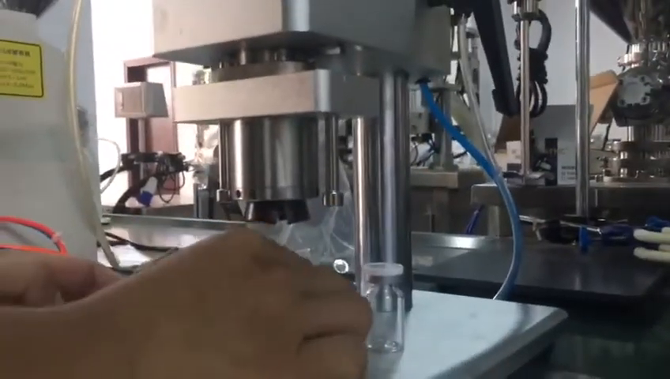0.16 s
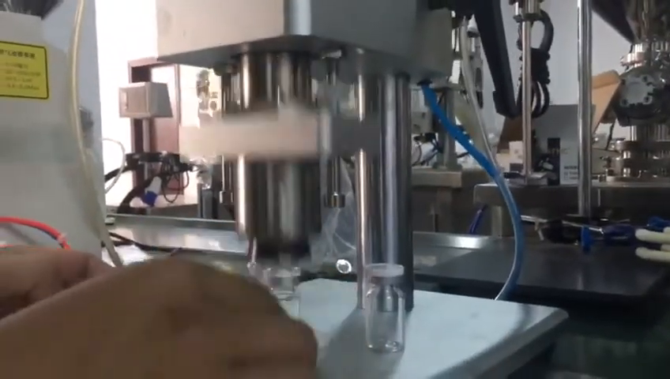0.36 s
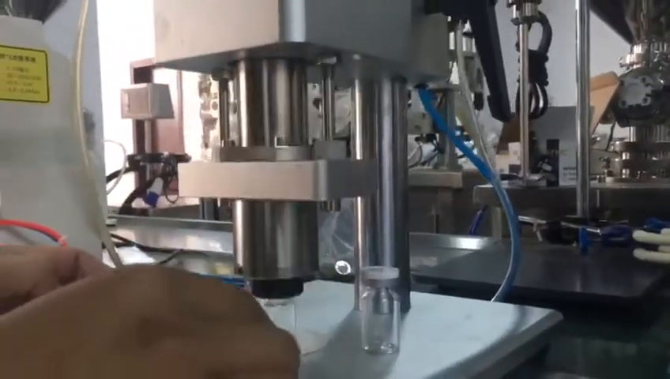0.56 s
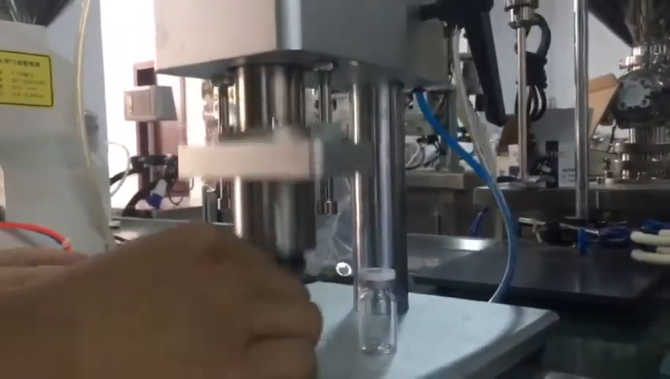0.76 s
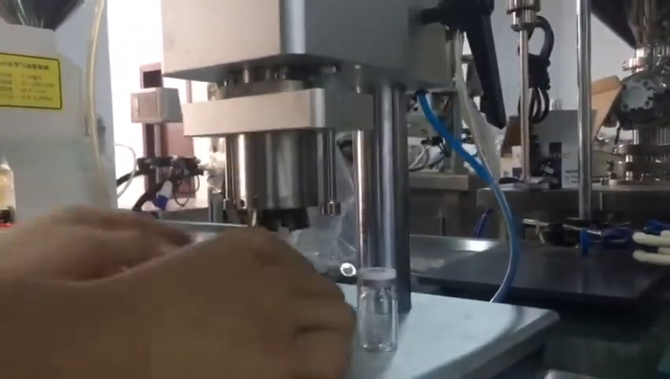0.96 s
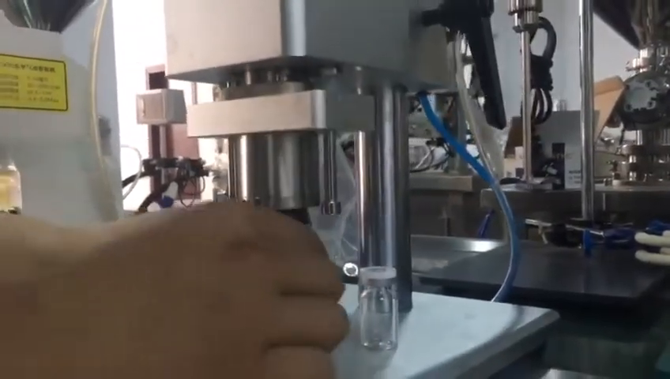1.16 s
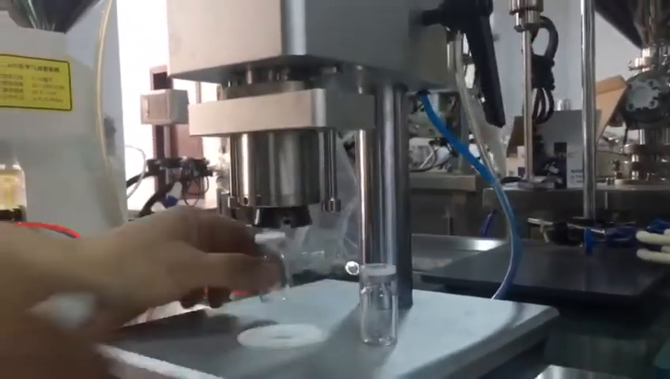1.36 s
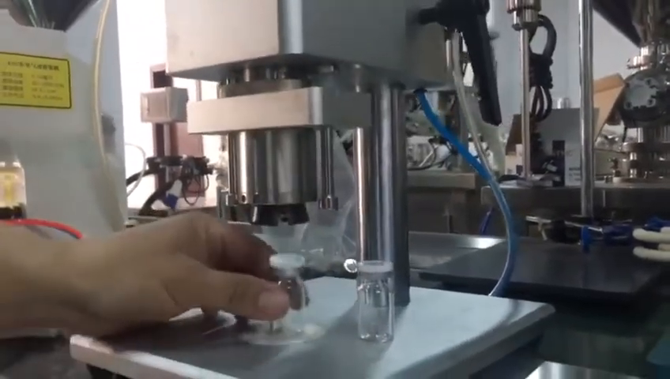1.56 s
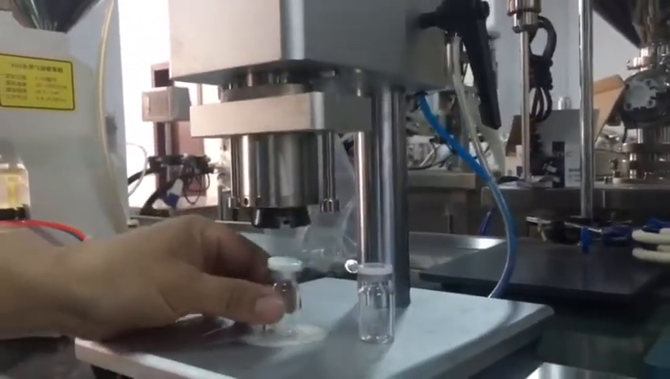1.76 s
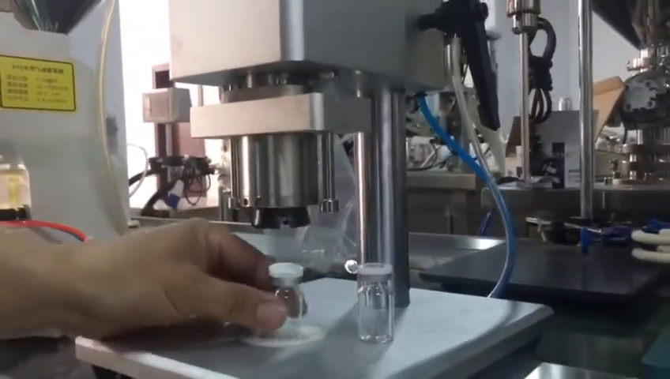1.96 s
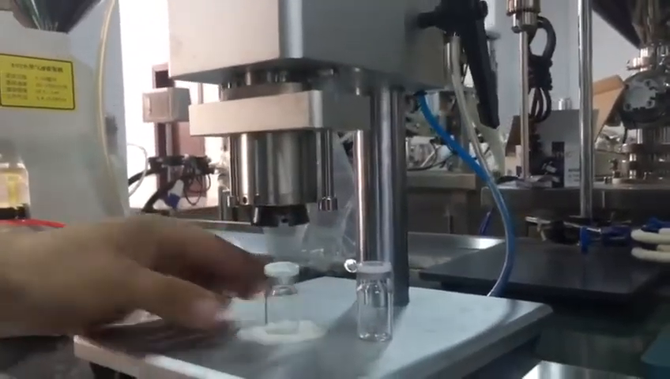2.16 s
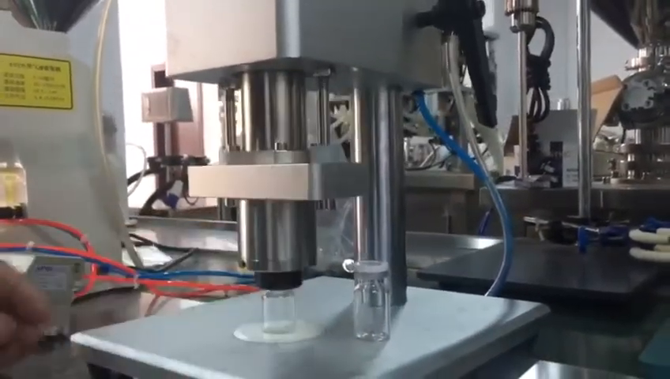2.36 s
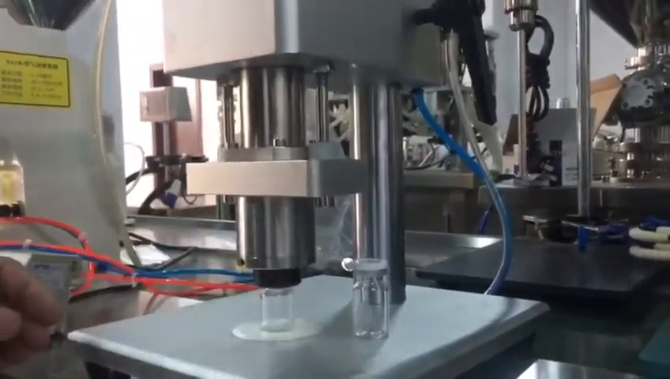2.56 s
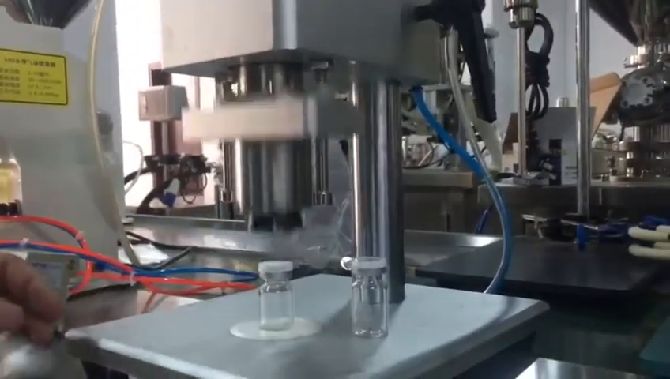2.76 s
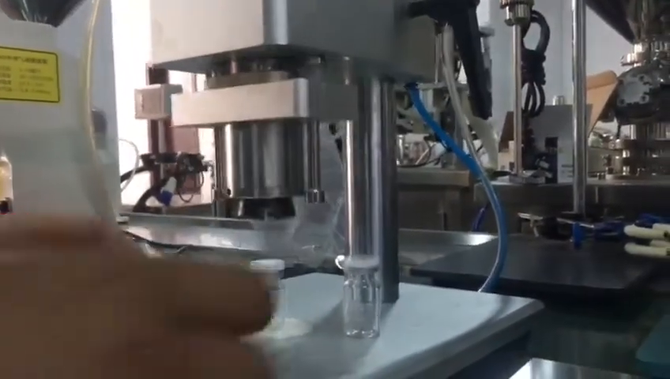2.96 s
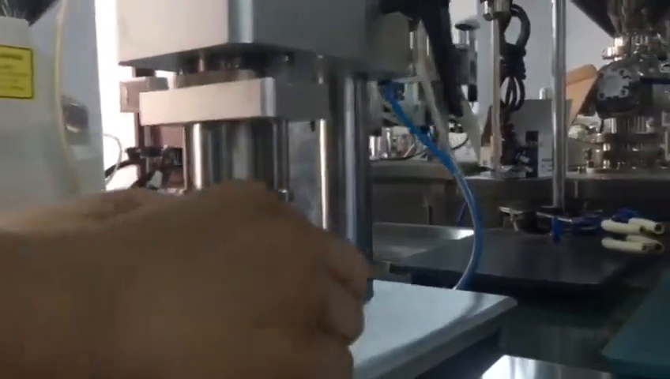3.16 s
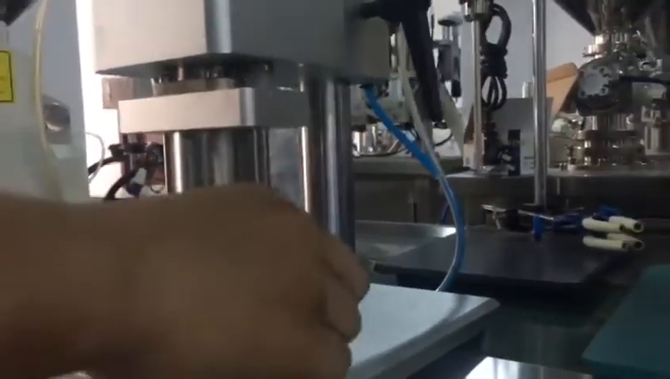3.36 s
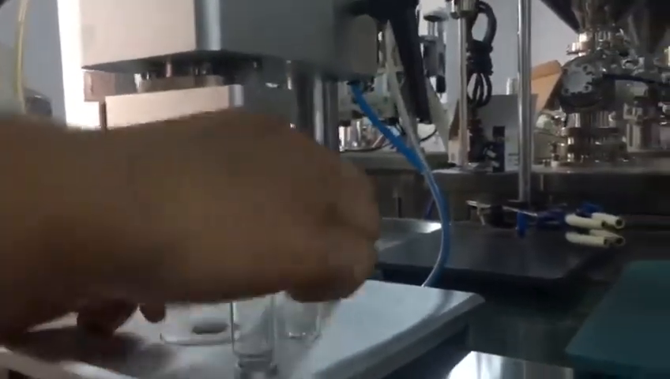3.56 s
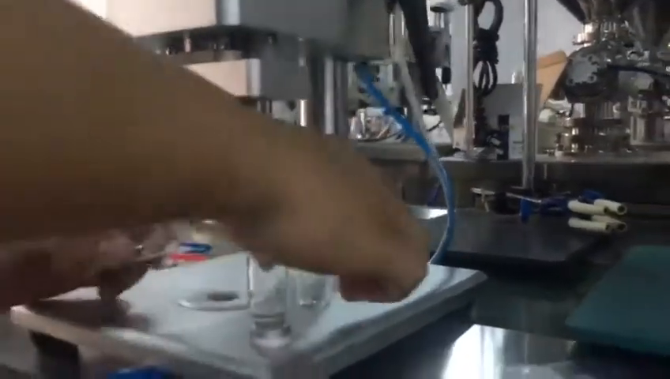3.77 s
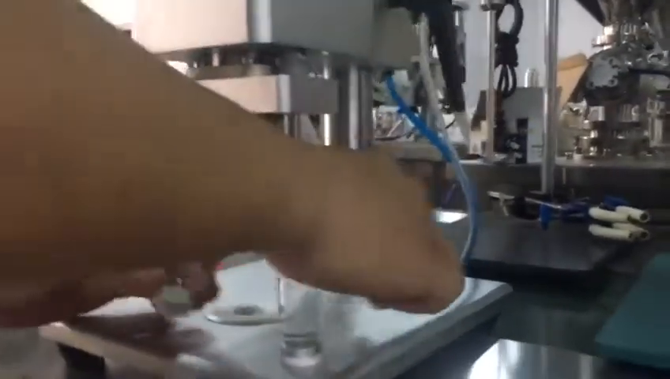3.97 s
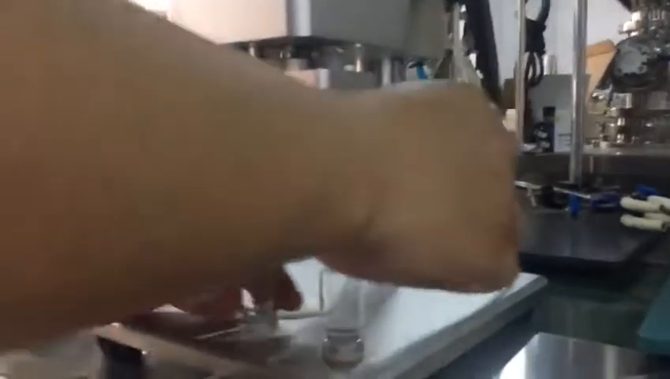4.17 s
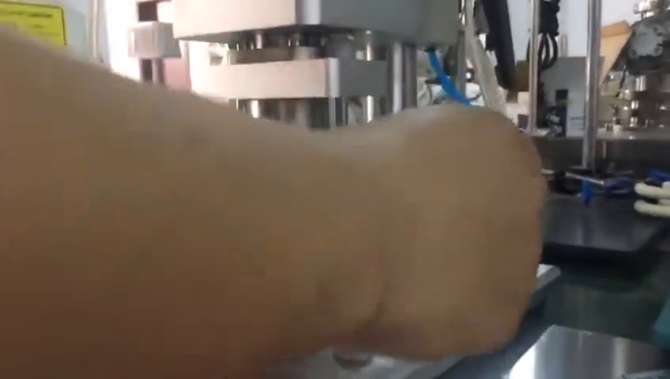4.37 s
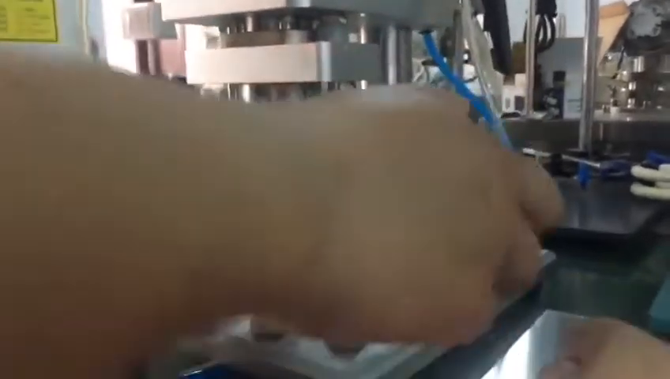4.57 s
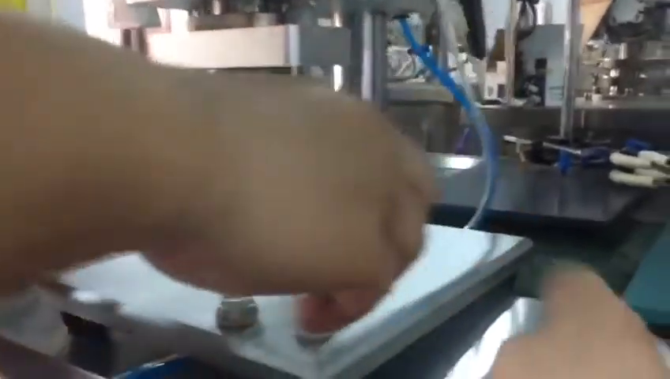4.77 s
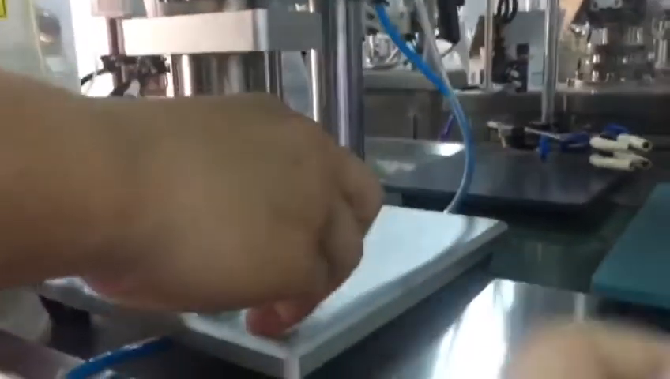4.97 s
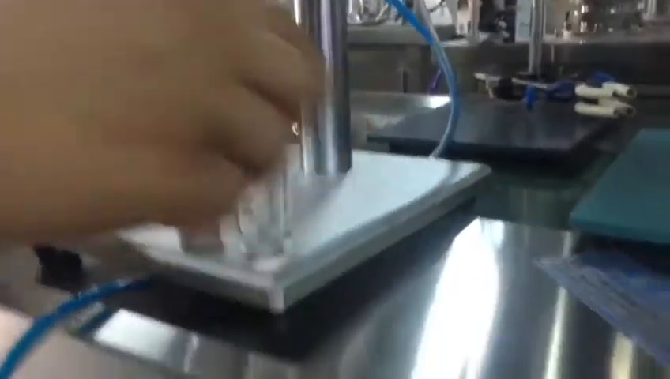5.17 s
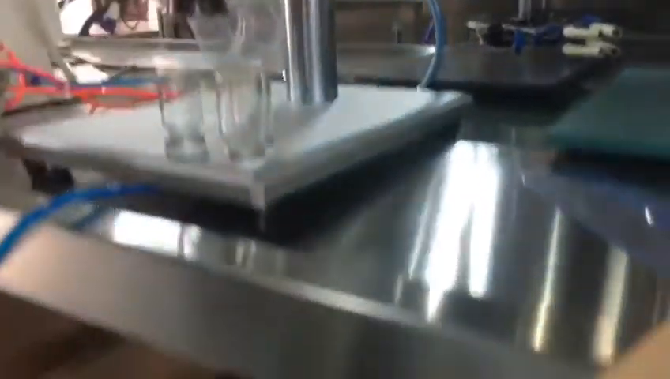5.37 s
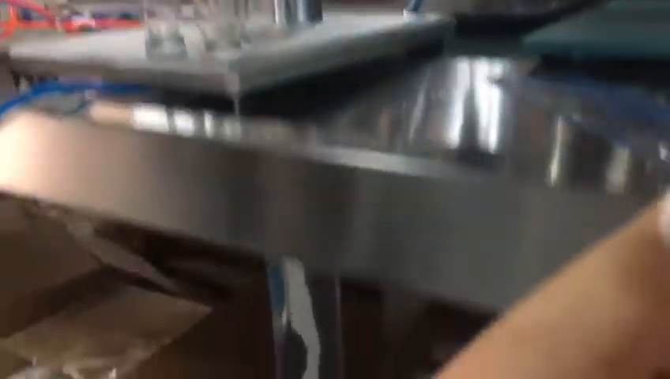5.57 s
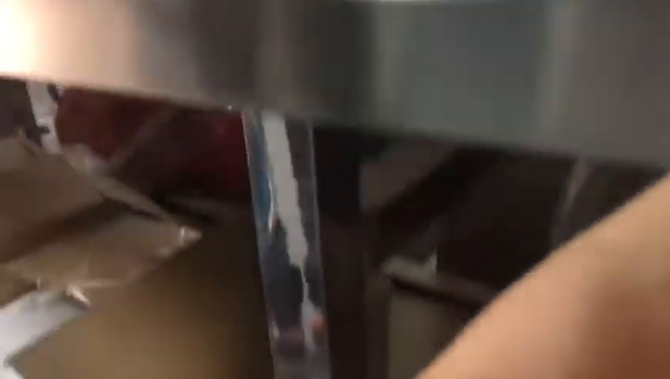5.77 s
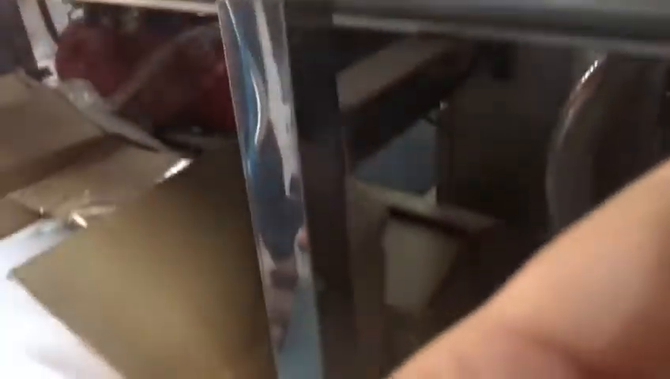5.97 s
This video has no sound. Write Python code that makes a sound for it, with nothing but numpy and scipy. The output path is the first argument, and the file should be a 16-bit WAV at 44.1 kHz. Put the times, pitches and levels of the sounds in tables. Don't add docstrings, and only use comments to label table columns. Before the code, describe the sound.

A bench-top air press runs two quick cycles of pops, sharp hisses and thumps, with glass vials clicking and clinking in a ringing factory hall.

```python
import sys
import numpy as np
from scipy import signal
from scipy.io import wavfile
from scipy.ndimage import uniform_filter1d

SR = 44100
rng = np.random.default_rng(int(sys.argv[2]) if len(sys.argv) > 2 else 0)


def ratio_of_db(decibels):
    return 10 ** (np.asarray(decibels, float) / 20)


def to_wav(sig):
    pcm = np.clip(np.atleast_2d(sig), -1, 1) * 32767
    pcm = np.round(pcm).astype(np.int16)
    wavfile.write(sys.argv[1], SR, pcm.T)


N = 265834

# (frequency [Hz], width [Hz], level [dB])
BASE_PLATE = [(800, 500, -12), (1163, 80, -8), (1560, 90, 0), (1800, 250, -2), (2035, 70, -3),
              (2190, 120, -4)]
# (valve opens [s], travel time to the stop [s], direction [0 down, 1 up])
PISTON_STROKES = [
    (.369, .1327, 0),
    (.7148, .1831, 1),
    (2.297, .133, 0),
    (2.659, .181, 1),
]


def evened(x):
    return x / np.sqrt(np.mean(x ** 2) + 1e-20)


def read(points, hz):
    f, value = np.transpose(points)
    return np.interp(np.log(hz + 1), np.log(f + 1), value)


def add(mix, s, sound):
    part = mix[round(s * SR):][:len(sound)]
    part += sound[:len(part)]


def resonate(x, hz, width):
    return signal.lfilter(*signal.iirpeak(hz, hz / max(width, 1), SR), x)


def dying(db, t60, seconds):
    return ratio_of_db(db - 60 * np.arange(round(seconds * SR)) / SR / t60)


def turbulence(spectrum, peaks, patchy_db, size=512):
    hz = np.fft.rfftfreq(size, 1 / SR)
    a, b, patches = rng.standard_normal((4 * N // size + 5, len(hz), 3)).T
    patches = uniform_filter1d(patches, size=5, axis=0)
    patches = evened(uniform_filter1d(patches, size=12, axis=1))
    humps = np.ones(len(hz))
    for f, width, db in peaks:
        humps += ratio_of_db(db) / (1 + (2 * (hz - f) / width) ** 2)
    colour_db = read(spectrum, hz)[:, None] + patchy_db * patches
    z = (a + 1j * b) * ratio_of_db(colour_db) * humps[:, None]
    return evened(signal.istft(z, nperseg=size, noverlap=3 * size // 4)[1][:N])


def contact(chatter_db, t60, seconds):
    force = rng.standard_normal(round(seconds * SR)) * dying(chatter_db, t60, seconds)
    force[0] = 1
    return force


def body(force, resonances, uneven_db):
    weights_db = uneven_db * rng.standard_normal(len(resonances))
    ring = np.zeros(len(force))
    for k, (hz, width, db) in enumerate(resonances):
        gain = (-1) ** k * ratio_of_db(db + weights_db[k]) * np.sqrt(SR / width)
        ring += gain * resonate(force, hz, width)
    return ring


def factory():
    # (frequency [Hz], level [dB per Hz])
    floor_colour = [(24, -56), (40, -5.5), (65, 36), (91, -16.5), (184, -6), (225, -7.5), (364, -11.5),
                    (467, -20), (535, -19.5), (573, -17), (2630, -18.5), (5450, -5.5), (9200, -16),
                    (12000, -67), (20200, -120)]
    # (frequency [Hz], width [Hz], level [dB])
    leak_tubes = [(3660, 30, 3.5), (4284, 18, 22.5), (4674, 39, 12.5), (5370, 78, 9.5), (5860, 270, -1.5),
                  (6350, 250, 6.5), (6860, 140, 10.5), (7190, 84, 4.5), (8500, 550, -13.5)]
    floor = turbulence(floor_colour, leak_tubes, patchy_db=1.0, size=1024)
    low = signal.sosfiltfilt(signal.butter(2, 1500, fs=SR, output="sos"), floor)
    shade_db = np.where(np.arange(N) / SR > 5.48, -3, 0)
    rumble = low * ratio_of_db(6.5)
    leak = (floor - low) * ratio_of_db(-2.5 + shade_db)
    motor = evened(resonate(rng.standard_normal(N), 530, 6))
    return ratio_of_db(-48.5) * (rumble + leak) + ratio_of_db(-69) * motor


def earlier_tap():
    ring_db, ring_t60, tick_over_ring_db, tick_t60 = -51, 1.25, 8.5, 0.55
    ring = evened(body(rng.standard_normal(SR // 2), BASE_PLATE[2:], uneven_db=5))
    tick = evened(resonate(rng.standard_normal(SR // 2), 2700, 4400))
    fading = ring * dying(ring_db, ring_t60, .5)
    fading += tick * dying(ring_db + tick_over_ring_db, tick_t60, .5)
    return np.pad(fading, (0, N - len(fading)))


def glass_tick(force, hz):
    return ratio_of_db(9.5) * resonate(resonate(force, hz, 2.4 * hz), hz, 2.4 * hz)


def landing(db, t60, tick_hz, ring_db, surface):
    force = contact(-16, t60, .15)
    ring = body(force, surface, uneven_db=1.5)
    return ratio_of_db(db) * (glass_tick(force, tick_hz) + ratio_of_db(ring_db - 3) * ring)


def vials_on_plate():
    # (time [s], peak level [dB], plate ring over tick [dB], chatter t60 [s])
    plate_clicks = [(.2834, -42, 5, .03), (.3384, -26.5, -1, .04), (1.288, -42, 7, .053),
                    (1.604, -22, 1.5, .022), (1.617, -38, 7, .05), (1.734, -47, 9.5, .07),
                    (1.9079, -8, -4, .02), (1.919, -34, 10, .11), (2.199, -34, -9, .03),
                    (2.2569, -27, -4, .038), (3.4037, -33, -5, .056), (3.96, -45, 11, .1),
                    (4.088, -39, -12, .025)]
    out = np.zeros(N)
    for s, db, ring_db, t60 in plate_clicks:
        add(out, s, landing(db, t60, 3130, ring_db, BASE_PLATE))
    return out


def exhaust_air():
    # (frequency [Hz], level [dB per Hz])
    down_colour = [(180, -71), (300, -21), (389, -12), (656, -13), (804, -58), (1730, -6), (2160, -5.5),
                   (3430, 2), (5450, 7), (8430, 7.5), (9600, 2.5), (12500, -56), (21100, -120)]
    up_colour = [(290, -32), (500, -20), (810, -24), (1260, -14), (1900, -13), (2460, -12), (3190, -3.5),
                 (4190, -3.5), (6230, -2), (7800, -7), (9600, -7), (12500, -45.5), (21100, -120)]
    seep_colour = [(1500, -26), (3000, -11.5), (5000, -19), (6900, -8.5), (7700, -26), (9200, -1.5),
                   (10500, -16)]
    # (frequency [Hz], width [Hz], level [dB])
    muffler_holes = [(2190, 250, 0), (3054, 380, -13), (5860, 510, -14.5), (6430, 96, -10.5)]
    open_db, end_db = (-19.5, -20.5), (-22.5, -23.5)
    rise_s, run_on_s = (.0015, .005), (.018, .004)
    empty_db_per_s = (497, 383)
    seep_s, seep_db = (.02, .038), (-38, -32.5)
    t, out = np.arange(N) / SR, np.zeros(N)
    passages = [(hz, width, db + 6.5) for hz, width, db in muffler_holes]
    jets = [turbulence(colour, passages, patchy_db=.8) for colour in (down_colour, up_colour)]
    thin = turbulence(seep_colour, [], patchy_db=.8)
    for opens, travel, up in PISTON_STROKES:
        way = round(up)
        since = np.maximum(t - opens, 0)
        shuts = opens + travel + run_on_s[way]
        flow_db = np.interp(t, [opens, shuts], [open_db[way], end_db[way]])
        flow_db += 5.5 * np.exp(-since / 0.039)
        flow_db -= empty_db_per_s[way] * np.maximum(t - shuts, 0)
        out += jets[way] * ratio_of_db(flow_db) * np.minimum(since / rise_s[way], 1)
        seeping = np.clip((t - opens + seep_s[way]) / .007, 0, 1) * (since < .003)
        out += thin * ratio_of_db(seep_db[way]) * seeping
    return out


def valve_pops():
    # (frequency [Hz], width [Hz], level [dB])
    valve_block = [(70, 160, 1), (164, 56, 5.5), (610, 260, 1), (1176, 95, 0.5), (1460, 360, -2),
                   (2330, 410, -8.5)]
    # (time after the valve opens [s], level [dB], t60 [s], thinning high-pass [Hz])
    down_pops = [
        (-.011, -37, .03, 40),
        (0.0, -15, .033, 40),
    ]
    up_pops = [
        (.001, -20, .035, 60),
        (.0495, -21, .03, 900),
    ]
    out = np.zeros(N)
    for opens, _, up in PISTON_STROKES:
        for after, db, t60, thin_hz in (down_pops, up_pops)[round(up)]:
            pop = body(contact(-24.0, t60, .15), valve_block, uneven_db=2.5)
            pop = signal.lfilter(*signal.butter(1, thin_hz, "high", fs=SR), pop)
            add(out, opens + after, ratio_of_db(db + 9.5) * pop)
    return out


def piston_stops():
    # (frequency [Hz], width [Hz], level [dB])
    lower_frame = [(65, 40, -14), (100, 50, -9), (160, 60, -10), (215, 35, -5), (315, 60, -11),
                   (480, 200, -6), (700, 300, -9), (900, 250, -12), (1114, 80, -7), (1350, 300, -10),
                   (1610, 250, -8), (2100, 400, -8), (2700, 600, -9)]
    upper_frame = [(62, 30, -16), (112, 25, -10), (170, 40, -4), (225, 45, -4), (305, 50, -7),
                   (375, 50, -9), (450, 90, -10), (600, 180, -11), (850, 300, -12), (1150, 250, -12),
                   (1553, 25, -15), (1700, 500, -13), (2040, 200, -14)]
    out = np.zeros(N)
    for opens, travel, up in PISTON_STROKES:
        way = round(up)
        swaying = resonate(rng.standard_normal(SR // 2), 440, 1080) * dying(-23.5, 0.43, .5)
        shudder = contact(-24, .09, .5) + swaying
        thump = body(shudder, (lower_frame, upper_frame)[way], uneven_db=1.0)
        add(out, opens + travel, ratio_of_db((-8, -9.5)[way] + 9.5) * thump)
    return out


def vials_on_tray():
    # (frequency [Hz], width [Hz], level [dB])
    loose_tray = [(420, 400, 1), (950, 400, -1), (1700, 600, 3), (2600, 600, -6), (3900, 300, -9)]
    # (time [s], peak level [dB], chatter t60 [s])
    tray_clicks = [
        (4.7011, -29, 0.015),
        (4.7031, -28.5, 0.15),
        (4.752, -35, 0.011),
        (4.7576, -18, 0.043),
        (4.771, -19.5, 0.067),
        (4.7867, -36.5, 0.41),
        (4.845, -42, .03),
    ]
    out = np.zeros(N)
    for s, db, t60 in tray_clicks:
        add(out, s, landing(db, t60, 2480, -3.5, loose_tray))
    return out


def vials_touching():
    # (time [s], peak level [dB])
    glass_clinks = [(4.9253, -22), (4.9292, -23), (4.9316, -27), (4.968, -37), (4.975, -18), (4.981, -30),
                    (5.0024, -20)]
    out = np.zeros(N)
    for s, db in glass_clinks:
        tick = glass_tick(contact(-16, .007, .15), 4800)
        add(out, s, ratio_of_db(db) * signal.lfilter(*signal.butter(2, 2600, "high", fs=SR), tick))
    return out


def fingers_on_case():
    # (time [s], thud level [dB], rub level [dB])
    finger_shifts = [(5.47, -60, -64), (5.55, -54, -50), (5.615, -62, -51), (5.68, -56, -52),
                     (5.76, -55, -62), (5.86, -58, -64)]
    s, thud_db, rub_db = np.transpose(finger_shifts)[:, :, None]
    t = np.arange(N) / SR
    grip_db = -np.maximum(180 * (s - t), 150 * (t - s))
    slips = rng.standard_normal((N, 2)) * (rng.random((N, 2)) < 3000 / SR)
    thud = evened(resonate(resonate(slips[:, 0], 104, 60), 110, 60))
    rub = evened(sum(resonate(resonate(slips[:, 1], hz, 70), hz, 70) for hz in (250, 300, 380)))
    rub = rub + ratio_of_db(-9) * evened(resonate(slips[:, 1], 900, 5000))
    return thud * ratio_of_db((thud_db + grip_db).max(axis=0)) + rub * ratio_of_db((rub_db + grip_db).max(axis=0))


def phone_bump():
    out = np.zeros(N)
    scuff = evened(resonate(rng.standard_normal(round(.03 * SR)), 5500, 5500))
    add(out, 5.655, ratio_of_db(-48) * np.hanning(len(scuff)) * scuff)
    first_hz, last_hz = 115, 55
    hz = last_hz + (first_hz - last_hz) * np.exp(-np.arange(SR // 2) / SR / .05)
    add(out, 5.677, dying(-41, .45, .5) * np.sin(2 * np.pi * np.cumsum(hz) / SR))
    return out


def hall(x, tail_db, dull_hz):
    # (frequency [Hz], t60 [s])
    hall_decay = [(100, 1.66), (260, 1.84), (420, 1.87), (700, 1.52), (1800, 1.57), (4800, 0.99),
                  (9000, 1.26)]
    # (delay [s], level [dB])
    near_echoes = [(.003, -13), (.0065, -14), (.012, -17), (.019, -19), (.027, -20)]
    taps = np.zeros(2 * SR)
    at = np.arange(700, 2 * SR - 20, 20)
    taps[at + rng.integers(0, 20, len(at))] = rng.choice([-1., 1.], len(at))
    hz, t, z = signal.stft(taps, SR, nperseg=512)
    z = z * ratio_of_db(-60 * t / read(hall_decay, hz)[:, None])
    open_tail = signal.istft(z, SR, nperseg=512)[1]
    tail = signal.istft(z / np.sqrt(1 + (hz[:, None] / dull_hz) ** 2), SR, nperseg=512)[1]
    tail = ratio_of_db(tail_db) * tail / np.linalg.norm(open_tail)
    for k, (s, db) in enumerate(near_echoes):
        add(tail, s, np.array([(-1) ** k * ratio_of_db(db)]))
    return x + signal.fftconvolve(x, tail)[:N]


def squelch(x):
    # (frequency [Hz], level [dB])
    drop_below = [(2000, -40), (2700, -19), (3900, -11), (5000, -9), (6000, -12), (7500, -12), (7900, -7),
                  (8400, -12), (9000, -11), (9400, -8), (9800, -3)]
    hz, t, z = signal.stft(x, SR, nperseg=2048, window="cosine")
    power = abs(z) ** 2
    bands = np.add.reduceat(power, np.arange(0, len(hz), 8), axis=1) / 8
    bands = np.repeat(bands, 8, axis=1)[:, :len(hz)]
    treble = power[:, (hz > 3000) & (hz < 9000)].mean(axis=1, keepdims=True)
    demand_db = 3 * rng.standard_normal((len(hz) // 8 + 1, len(t) // 3 + 1))
    demand_db = np.repeat(np.repeat(demand_db, 8, axis=0), 3, axis=1)[:len(hz), :len(t)]
    limit = treble * ratio_of_db(2 * (read(drop_below, hz)[:, None] + demand_db))
    kept = (bands > limit) & (power > ratio_of_db(-2.5) * limit)
    return signal.istft(z * kept, SR, nperseg=2048, window="cosine")[1][:, :N]


def scene():
    clicks = vials_on_plate() + vials_on_tray() + vials_touching()
    near = hall(clicks, tail_db=-10.5, dull_hz=3020)
    near += hall(exhaust_air(), tail_db=-10, dull_hz=5000)
    near += hall(valve_pops() + piston_stops(), tail_db=-7.5, dull_hz=3020)
    return (factory() + earlier_tap() + near + fingers_on_case() + phone_bump())[None]


def low_pass(x):
    return signal.sosfilt(signal.butter(12, 10580, fs=SR, output="sos"), x)


def record(dry):
    cut = signal.sosfilt(signal.butter(4, 42, "high", fs=SR, output="sos"), dry)
    band_limit = signal.firwin(1023, 9740, window=("kaiser", 9), fs=SR)
    limited = signal.oaconvolve(cut, band_limit[None], "same")
    return low_pass(squelch(limited))


dry = scene()
out = record(dry)
to_wav(out)
```